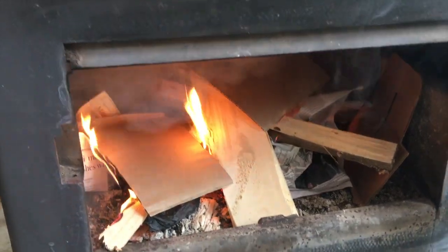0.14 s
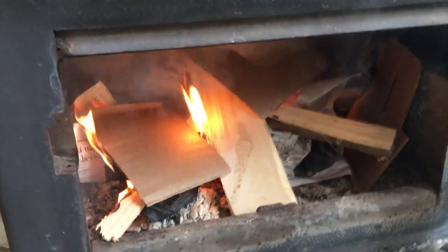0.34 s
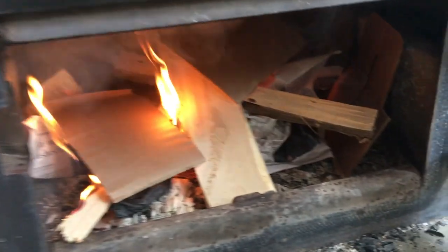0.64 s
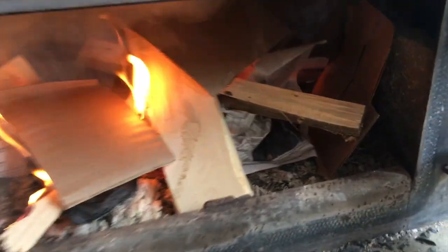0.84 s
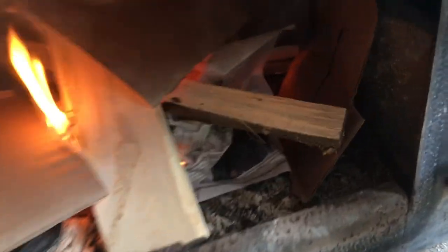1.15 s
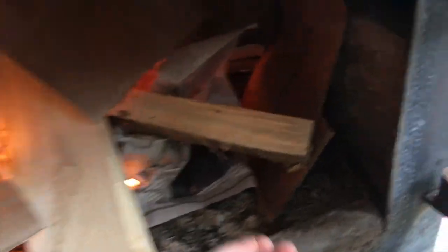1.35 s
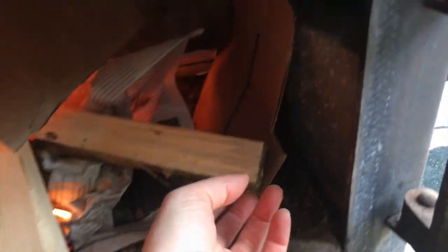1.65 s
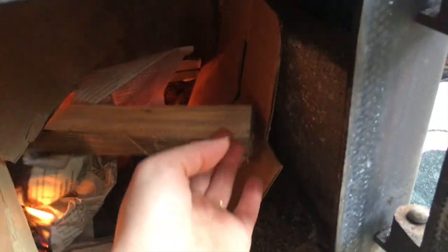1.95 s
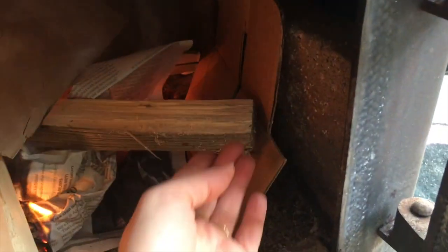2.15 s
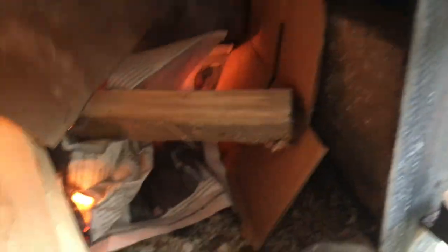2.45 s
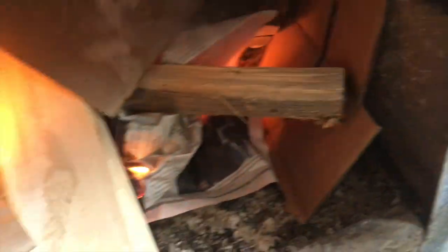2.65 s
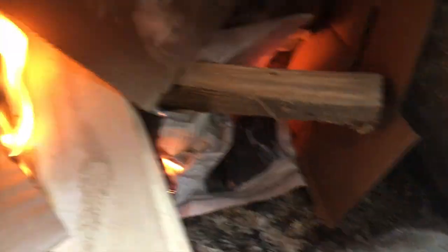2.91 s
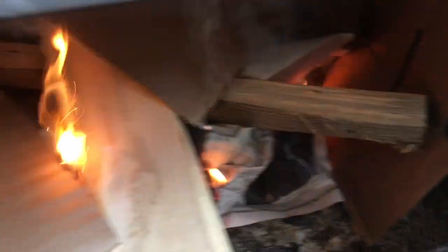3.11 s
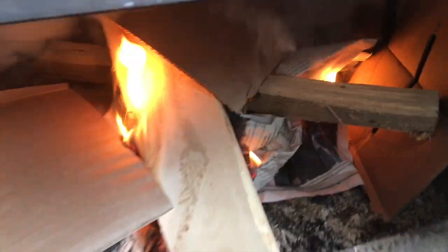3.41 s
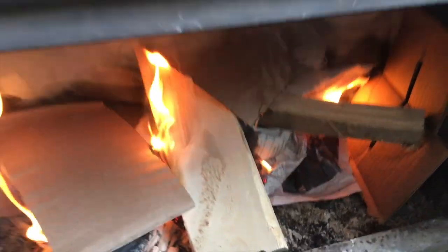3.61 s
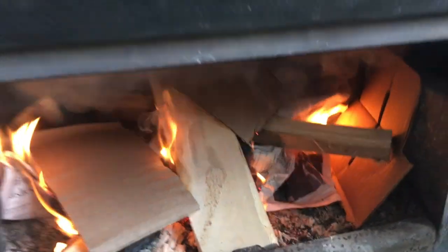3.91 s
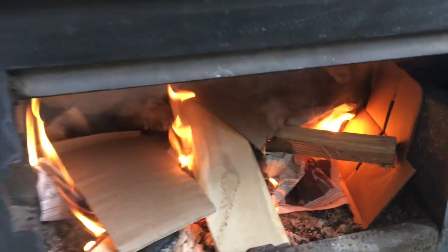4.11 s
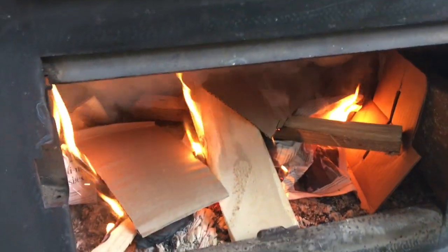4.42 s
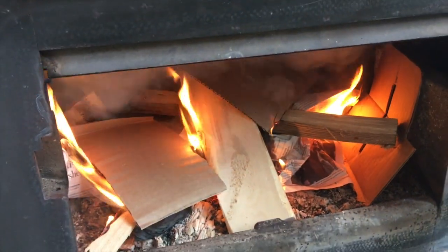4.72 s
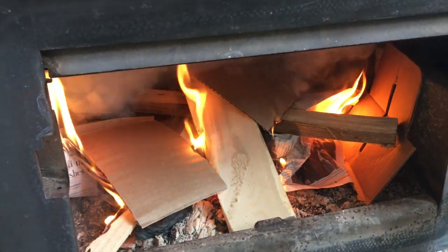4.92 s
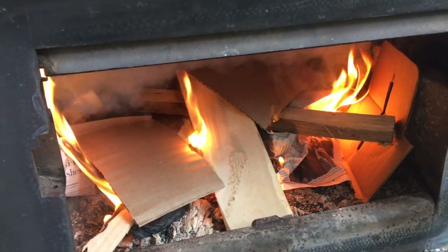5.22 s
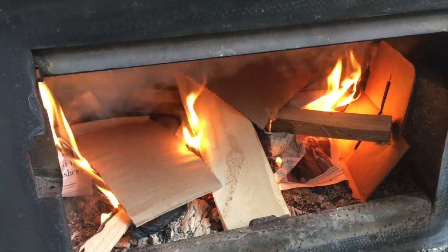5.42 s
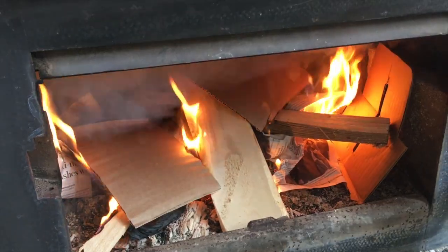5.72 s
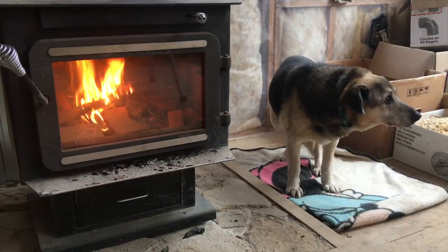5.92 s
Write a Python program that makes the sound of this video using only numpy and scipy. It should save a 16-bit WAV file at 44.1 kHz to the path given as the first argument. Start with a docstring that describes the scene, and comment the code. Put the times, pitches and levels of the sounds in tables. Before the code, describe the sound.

A handheld phone is close to an open steel wood stove in a small cabin. Quiet, low flame flutter swells and sinks over thin fizz, fine crackle and scattered small pops with tight metallic reflections. At 0.3 s a dull, reverberant clack comes from further off, with soft bumps. Cloth rustles from 0.5 s to about 1.9 s. Between 1.7 and 2.1 s rough wood scrapes over cardboard in two quick grainy shoves, with short woody knocks. More sleeve brushing and low bumps follow at 2.4 s. At 3.1 s a heavy thump, knock and hard bright snap coincide; a strong pop comes at 3.3 s. Light rubs and bumps fade towards 4.1 s. Sharp snaps at 4.3 and 4.45 s ring round the room, then loud pops at 5.5 and 5.6 s. Just before 6 s a low wavering hum with noise abruptly begins.

```python
"""Paper, cardboard and kindling catch fire in an open wood stove in a small cabin, heard from a phone at the door.
From the start filtered noise flutters as flames, over a faint fizz, random ticks and pops with steel reflections.
Soft bumps, rubs and a far clack join in; a sleeve rustles, then grainy friction pushes a stick over the cardboard.
Wood knocks ring in short modes, and three hard snaps from 3.1 s on ring round the room as decaying noise.
At the end a low drone, a wavering sine in a wash of noise, sets in."""
import sys
import numpy as np
from scipy import signal
from scipy.fft import rfft, irfft, next_fast_len
from scipy.io import wavfile
from scipy.ndimage import uniform_filter1d

SR = 44100
rng = np.random.default_rng(int(sys.argv[2]) if len(sys.argv) > 2 else 0)


def dump(signal):
    """Clip the signal to [-1, 1] and save it as 16-bit WAV at the path in sys.argv[1]."""
    limited = np.clip(np.atleast_2d(signal).T, -1, 1)
    pcm = np.round(limited * 32767).astype(np.int16)
    wavfile.write(sys.argv[1], SR, pcm)


N = 267113
T = np.arange(N) / SR

# spectrum of the pops and ticks of burning fibre: f/Hz, level/dB
POP_COLOUR = [(150, -3.5), (500, -18.5), (900, -17), (1600, -15.5), (2500, -9), (4500, -10), (7000, -7.5),
              (11000, -4), (15000, -3.5), (16500, -6.5)]
# spectrum of wood against cardboard: f/Hz, level/dB
SLIDE_COLOUR = [(200, 0), (380, 4), (600, -0.5), (800, -4.5), (1200, -0.5), (1900, -1), (2400, 2.5),
                (4300, -2), (6000, 5), (9000, 0.5), (14000, 4.5), (16000, -4.5)]


def amp(db):
    """Decibels to gain."""
    return 10 ** (np.asarray(db) / 20)


def unit(x):
    """Scale to rms 1."""
    return x / np.sqrt(np.mean(x ** 2))


def burst(x, db):
    """Scale a short sound so that its energy, packed into 3 ms, has this level."""
    return x * amp(db) * np.sqrt(.003 * SR / np.sum(x ** 2))


def fade(t, t60):
    """Exponential decay that falls 60 dB in t60 seconds."""
    return np.exp(-np.log(1000) * t / t60)


def follow(rows):
    """Gain along a (t/s, level/dB) curve, silent beyond it and smoothed over 400 samples."""
    s, db = np.transpose(rows)
    inside = (T >= s[0]) * (T <= s[-1])
    return uniform_filter1d(amp(np.interp(T, s, db)) * inside, size=400)


def colour(x, points, shelf_db=0, shelf_hz=3500):
    """Causal minimum-phase filter through (f/Hz, level/dB) points, with a shelf that lifts or cuts the lows."""
    n = next_fast_len(len(x) + 4096) * 2
    f = np.maximum(np.arange(n // 2 + 1) * SR / n, 1)
    hz, db = np.transpose(points)
    shelf = shelf_db / (1 + np.square(np.square(f / shelf_hz)))
    db = np.interp(np.log(f), np.log(hz), db) + shelf
    # folding the cepstrum forward in time makes the filter causal
    cepstrum = irfft(np.log(amp(db)))
    cepstrum[1:n // 2] *= 2
    cepstrum[n // 2 + 1:] = 0
    response = np.exp(rfft(cepstrum))
    return irfft(rfft(x, n) * response)[:len(x)]


def walk(rate):
    """Smooth, bounded random wander with an rms of 1, drawing `rate` new targets per second."""
    k = max(int(SR / rate), 1)
    steps = np.repeat(rng.uniform(-1, 1, N // k + 1), k)
    return unit(uniform_filter1d(steps, size=k)[:N])


def grains(rate, spread_db):
    """Random impulses, `rate` per second on average, mostly small and a few large."""
    hits = rng.random(N) < rate / SR
    signs = rng.choice([-1, 1], N)
    sizes = amp(spread_db * np.minimum(rng.exponential(size=N), 4))
    return hits * signs * sizes


def add(out, s, x):
    """Mix a short sound in at time s."""
    i = max(int(s * SR), 0)
    out[i:i + len(x)] += x[:N - i]


def click(points):
    """A single clean click with this spectrum."""
    return colour(signal.unit_impulse(SR // 25), points)


def ring(modes, detune):
    """A struck body's decaying modes (f/Hz, t60/s, level/dB), a little different at every blow."""
    t = T[:SR // 3]
    out = np.zeros(len(t))
    for hz, t60, db in modes:
        blow_hz = hz * (1 + detune * rng.standard_normal())
        out += amp(db) * np.sin(2 * np.pi * blow_hz * t) * fade(t, t60)
    return out


def firebox(ring_db, t60):
    """One click and its dense reflections between the steel plates."""
    t = T[:SR // 25]
    echoes = rng.standard_normal(len(t)) * fade(t, t60)
    echoes *= amp(ring_db) / np.linalg.norm(echoes)
    echoes[0] = 1
    return echoes


def cabin(x, t60_low, t60_high, echo_s, echo_db):
    """Diffuse room tail with separate low and high decays that swells again off the far wall."""
    t = T[:SR // 2]
    low, high = rng.standard_normal((2, len(t)))
    low = colour(low, [(300, -1.5), (2500, 2.5), (6000, 1.0), (14000, -7.5)]) * fade(t, t60_low)
    high = colour(high, [(3000, -20), (9000, -0.5), (14000, 0.5)]) * fade(t, t60_high)
    echo = 1 + amp(echo_db) * (t > echo_s) * fade(np.abs(t - echo_s), 0.053)
    build_up = np.clip(t / 0.016, 0, 1)
    tail = (low + high) * echo * build_up
    return signal.fftconvolve(x, tail / np.linalg.norm(tail))[:N]


def strokes(rows, power):
    """Each movement speeds up from rest and slows again; friction noise grows as a power of the speed."""
    gain = np.zeros(N)
    for start, fastest, end, db in rows:
        speed = np.sin(np.interp(T, [start, fastest, end], [0, np.pi / 2, 0]))
        gain += amp(db) * speed ** power
    return gain


def flames(gain_db, flutter_db):
    """Unsteady burning drives a low flutter in the firebox."""
    # flames, strongest while the phone is nearest: t/s, level before gain_db/dB
    flame_curve = [(0.0, -68.5), (0.25, -62.5), (0.59, -66), (0.88, -56), (1.3, -62), (1.53, -57.5),
                   (1.67, -56.5), (1.95, -54), (3.03, -60.5), (3.15, -62.5), (3.74, -60.5), (4.08, -55.5),
                   (4.55, -65), (5.11, -65.5), (6.05, -56.5)]
    # spectrum of the flutter: f/Hz, level/dB
    flame_colour = [(15, -47.5), (25, -13.5), (69, 1), (92, 2), (119, 0), (151, -10.5), (184, -15),
                    (301, -23), (472, -30.5), (565, -33), (900, -36), (1170, -57), (1980, -120)]
    roar = unit(colour(rng.standard_normal(N), flame_colour))
    return roar * follow(flame_curve) * amp(gain_db + flutter_db * walk(24))


def air(gain_db, waver_db):
    """A faint, slightly wavering fizz of noise under everything."""
    # steady fizz of the fire and the air of the cabin: f/Hz, level/dB
    air_colour = [(180, -22), (300, 2.5), (447, -5.5), (1030, -6.5), (1230, -10.5), (1930, -7.5),
                  (4910, -11), (7080, -3), (7690, -12), (14200, -3.5), (16000, -6.5)]
    fizz = unit(colour(rng.standard_normal(N), air_colour))
    return fizz * amp(-68 + gain_db + waver_db * walk(4.7))


def crackle(db):
    """Countless tiny ticks of burning paper between the pops, each a short spit of noise."""
    ticks = np.abs(grains(rate=110, spread_db=6.0))
    spits = signal.fftconvolve(ticks, fade(T[:SR // 25], 0.025))[:N]
    return amp(db) * unit(colour(spits * rng.standard_normal(N), POP_COLOUR))


def faint_pops(per_s, db, spread_db):
    """Small pops at random moments, as rows of t/s, level/dB and lift of the mids/dB."""
    rows = []
    for when, size, mids in rng.random((int(per_s * N / SR), 3)):
        rows.append((when * N / SR, db + spread_db * (2 * size - 1), 10 * (2 * mids - 1)))
    return rows


def pops(gain_db, body_db, room_db, ring_db, ring_t60):
    """Pockets of gas burst the fibres, each with its own firebox reflections; returns near sound and room feed."""
    # louder pops in the firebox: t/s, level before the layer gains/dB, lift of the mids before body_db/dB
    loud_pops = [(0.1668, -47, -6), (0.8296, -52, 9), (1.0087, -48, 4), (1.042, -48.5, -14),
                 (1.192, -50.5, 7), (1.3393, -50, -4), (1.443, -43.5, 8), (1.592, -42.5, -0.5),
                 (1.6488, -47, -4), (1.6775, -48.5, 17), (2.2254, -49, 3), (2.2377, -46.5, 0),
                 (2.5546, -49, 15), (2.6894, -51, 11), (2.7566, -46.5, 6), (2.9704, -42.5, 6),
                 (3.08, -47, -6), (3.2794, -47, -5), (3.3367, -27.5, -3.5), (3.647, -50.5, 4),
                 (3.887, -52, -12), (4.107, -42.5, 0), (4.1921, -47.5, 5), (4.2545, -42.5, 1),
                 (4.79, -50, 1.5), (4.9144, -48.5, 9.5), (4.984, -42, -6.5), (5.297, -47.5, -2.5),
                 (5.4732, -23, -3.5), (5.6314, -20, -4.5), (5.8263, -47.5, -17)]
    out, feed, clean = np.zeros(N), np.zeros(N), click(POP_COLOUR)
    for s, db, mids_db in loud_pops + faint_pops(per_s=8, db=-60, spread_db=1.5):
        pop = colour(firebox(ring_db=ring_db, t60=ring_t60), POP_COLOUR, shelf_db=mids_db + body_db)
        add(out, s, burst(pop, db + gain_db))
        add(feed, s, burst(clean, db + room_db))
    return out, feed


def rubs(gain_db, width):
    """Friction noise in a gliding resonance whose width is a share of its first pitch."""
    # brief rubs as things are handled: start/s, end/s, first f/Hz, last f/Hz, level before gain_db/dB
    rub_rows = [(0.102, 0.221, 176, 188, -58), (0.933, 1.095, 200.5, 226.4, -60.5),
                (1.101, 1.17, 585, 472, -65.5), (1.73, 1.789, 6470, 6200, -54),
                (1.791, 1.99, 359.6, 397, -57.5), (2.836, 3.004, 1355, 1310, -65),
                (3.249, 3.555, 1255, 1106, -63.5), (3.52, 3.611, 801, 560, -62.5),
                (3.84, 3.957, 167.6, 190, -58), (4.083, 4.142, 279, 180, -61)]
    out = np.zeros(N)
    for start, end, first_hz, last_hz, db in rub_rows:
        glide_hz = np.interp(T, [start, end], [first_hz, last_hz])
        phase = 2 * np.pi * np.cumsum(glide_hz) / SR
        band = walk(width * first_hz) * np.cos(phase) + walk(width * first_hz) * np.sin(phase)
        stroke = np.sqrt(np.maximum((T - start) * (end - T), 0)) * 2 / (end - start)
        out += band * stroke * amp(db + gain_db)
    return out


def bumps(cycles):
    """Each bump is a low swing that dies by 60 dB in a few cycles."""
    # soft bumps and puffs of air on the hand-held phone: t/s, level before a 5 dB lift/dB, f/Hz
    bump_rows = [(0.28, -47.5, 109), (0.688, -47.5, 90), (0.98, -42.5, 115), (1.52, -46, 84),
                 (1.597, -43, 100), (1.855, -39, 123), (2.117, -48, 380), (2.449, -38.5, 176),
                 (2.532, -33.5, 73), (2.535, -41, 230), (3.104, -25.5, 66.4), (3.105, -27, 159),
                 (3.434, -41, 86), (3.596, -43.5, 89), (3.875, -34.5, 55), (4.096, -38, 56),
                 (4.73, -42.5, 92)]
    out, t = np.zeros(N), T[:SR // 4]
    soft_onset = 1 - fade(t, 0.006)
    for s, db, hz in bump_rows:
        swing = np.sin(2 * np.pi * hz * t) * fade(t, cycles / hz)
        add(out, s, amp(db + 5.0) * swing * soft_onset)
    return out


def clack(s, db, direct_db, ring_db, room_db):
    """Something clacks further off in the cabin: a hard but dull onset, a faint ring and much reverberation."""
    # spectrum of the clack fed to the room: f/Hz, level/dB
    clack_colour = [(300, -2.5), (800, -30), (1000, 1), (1180, -14), (1400, -6), (2100, 0), (3100, -5.5),
                    (4200, -6.5), (4700, -15), (5400, -7), (6800, -17), (7600, -28), (16000, -31)]
    # ring of the clack: f/Hz, t60/s, level/dB
    clack_modes = [(996, 0.16, 4), (1346, 0.26, 0), (1730, .2, -7), (1960, 0.21, 2), (2190, 0.29, 5),
                   (2290, 0.23, -3), (2980, 0.18, 2), (4060, .2, -18), (5420, 0.54, -5.5)]
    direct, feed = np.zeros(N), np.zeros(N)
    onset_colour = [(300, -18), (800, -19), (1100, -1.0), (2000, 7), (3100, 1), (4000, -39), (16000, -45)]
    onset = colour(firebox(ring_db=12, t60=0.053), onset_colour)
    add(direct, s + .003, burst(onset, db + direct_db))
    add(direct, s + .003, burst(ring(clack_modes, detune=0.004), db + ring_db))
    add(feed, s, burst(click(clack_colour), db + room_db))
    return direct + cabin(feed, t60_low=0.41, t60_high=0.67, echo_s=0.026, echo_db=-8)


def knocks(gain_db, tick_db):
    """Kindling knocks: a bright contact tick and the short ring of the wood."""
    # the stick catches and wood shifts: t/s, level before the layer gains/dB, treble relative to that level/dB
    knock_rows = [(0.387, -49, -4), (1.741, -64.5, 21), (1.816, -55, 23), (1.848, -42.5, 8.5),
                  (1.878, -45, 4.5), (1.903, -48, 7), (2.045, -51.5, 20.5), (2.115, -38.5, -3),
                  (2.450, -48.5, -19), (3.106, -29.5, 4.5), (3.254, -40, -9), (3.338, -46, -14),
                  (3.520, -45.5, -26), (3.584, -48.5, -20), (4.109, -51.5, -14), (5.776, -58.5, 5.5)]
    # ring of the wood: f/Hz, t60/s, level/dB
    wood_modes = [(381, 0.069, -5), (496, 0.035, -3.5), (615, 0.05, -4), (1153, 0.026, 3.5),
                  (1434, 0.025, 1), (2090, 0.007, -4), (2604, 0.051, -4.5)]
    out = np.zeros(N)
    for s, db, treble_db in knock_rows:
        add(out, s, burst(ring(wood_modes, detune=0.077), db + gain_db))
        tick = colour(firebox(ring_db=11.5, t60=0.045), SLIDE_COLOUR)
        add(out, s, burst(tick, db + treble_db + tick_db))
    return out


def sleeve(gain_db, rough_db):
    """Cloth brushes on cloth while the arm moves."""
    # movements of the arm: start/s, fastest/s, end/s, level before gain_db/dB
    arm_moves = [(.5, 1.18, 1.93, -59.5), (2.17, 2.36, 2.67, -57.5), (2.76, 2.93, 3.22, -56),
                 (3.23, 3.29, 3.87, -56.5), (3.8, 3.88, 4.05, -66.5), (4.04, 4.11, 4.63, -69.5)]
    # spectrum of the cloth: f/Hz, level/dB
    sleeve_colour = [(200, 2), (500, -4), (800, -0.5), (1250, 2.5), (1700, -1), (2600, -0.5), (4500, -5),
                     (6000, -3.5), (9000, -5.5), (16000, -7)]
    brush = unit(colour(grains(rate=6000, spread_db=2), sleeve_colour))
    return brush * strokes(arm_moves, power=1.37) * amp(gain_db + rough_db * walk(35))


def slide(gain_db, jerk_db, splinter_db):
    """Rough wood drags over cardboard in dense fine grains; now and then a splinter catches."""
    # the hand shoves the stick twice: start/s, fastest/s, end/s, level before gain_db/dB
    shoves = [(1.73, 1.865, 1.956, -42.5), (1.87, 1.97, 2.137, -46)]
    fine = unit(grains(rate=4000, spread_db=3.5))
    splinters = amp(splinter_db) * unit(grains(rate=290, spread_db=2.5))
    rub = unit(colour(fine + splinters, SLIDE_COLOUR))
    return rub * strokes(shoves, power=1.57) * amp(gain_db + jerk_db * walk(90))


def snaps(gain_db, scatter_db, scatter_t60, body_db):
    """Hard cracks arrive straight, then off the stove, over a short hollow ring; returns near sound and room feed."""
    # hard snaps in front of the stove: t/s, level before the layer gains/dB, share sent round the room/dB
    snap_rows = [(3.1028, -19, -18), (4.2781, -16.5, -10.5), (4.4546, -18, -11)]
    # spectrum of a snap: f/Hz, level/dB
    snap_colour = [(100, -2), (350, -6.5), (520, -9), (680, -4.5), (860, -13.5), (1050, -7.5), (1600, -7.5),
                   (3000, 2.5), (4500, 0.5), (6500, 4), (9000, 6), (12000, 5), (15000, 2), (16500, -7)]
    # straight and off the stove front: delay/s, level/dB
    snap_paths = [(0, -1), (.0013, 1), (.0033, -5.5)]
    # hollow body of a snap: f/Hz, t60/s, level/dB
    snap_modes = [(372, 0.037, -8), (687, 0.032, -3.5), (1050, 0.015, 3), (2140, 0.021, -5)]
    out, feed = np.zeros(N), np.zeros(N)
    for s, db, room_db in snap_rows:
        crack = np.zeros(SR // 20)
        for delay, path_db in snap_paths:
            # weaker arrivals have met more surfaces and are more diffuse
            arrival = firebox(ring_db=scatter_db - 1.95 * path_db, t60=scatter_t60)
            add(crack, delay, amp(path_db) * arrival)
        add(out, s, burst(colour(crack, snap_colour), db + gain_db))
        add(out, s + 0.002065, burst(ring(snap_modes, detune=0.043), db + body_db))
        add(feed, s, burst(click(snap_colour), db + room_db))
    return out, feed


def drone(start_s, gain_db, hum_hz, hum_db, hiss_db):
    """A wavering low hum in a wash of noise sets in abruptly."""
    # spectrum of the wash of noise: f/Hz, level/dB
    drone_colour = [(71, -43), (120, -5), (261, -6), (483, -29), (805, -27), (968, -26), (1460, -27.5),
                    (1750, -29), (3520, -32), (4320, -36.5), (5750, -33.5), (12000, -32), (16000, -31)]
    wander_hz = hum_hz * (1 + 0.02 * walk(40))
    hum = np.sin(2 * np.pi * np.cumsum(wander_hz) / SR) * amp(hum_db + 1.2 * walk(29.8))
    wash = amp(hiss_db) * unit(colour(rng.standard_normal(N), drone_colour))
    onset = np.clip((T - start_s) / 0.0069, 0, 1)
    return (hum + wash) * amp(gain_db) * onset


def scene():
    """Fire, handling and background sound direct; pops, snaps and some of the wood also excite the cabin."""
    popping, pop_feed = pops(gain_db=1.0, body_db=-3.5, room_db=-22.5, ring_db=0.5, ring_t60=0.02)
    fire = flames(gain_db=3, flutter_db=1.5) + crackle(db=-67.5) + popping
    handling = rubs(gain_db=-2.0, width=.4) + bumps(cycles=4.7) + sleeve(gain_db=-.5, rough_db=1)
    background = air(gain_db=-1.5, waver_db=-0.9)
    background += clack(s=.280, db=-41.5, direct_db=3, ring_db=-0.5, room_db=7.0)
    background += drone(start_s=5.96, gain_db=-50, hum_hz=247, hum_db=0.5, hiss_db=-1.0)
    wood = knocks(gain_db=-4.5, tick_db=-3) + slide(gain_db=-1, jerk_db=2.6, splinter_db=-3.5)
    snapping, snap_feed = snaps(gain_db=-0.5, scatter_db=-3.5, scatter_t60=0.017, body_db=-18.5)
    room_feed = pop_feed + snap_feed + amp(-17.5) * wood
    room = cabin(room_feed, t60_low=0.36, t60_high=0.28, echo_s=.032, echo_db=-2.5)
    return (fire + snapping + wood + room + handling + background)[None]


def record(dry):
    """The phone drops the deepest bass below 36 Hz and cuts the top above 15.9 kHz."""
    bass_cut = signal.butter(4, 36, "high", fs=SR, output="sos")
    top_cut = signal.ellip(8, .2, 70, 15900, fs=SR, output="sos")
    return signal.sosfilt(top_cut, signal.sosfilt(bass_cut, dry))


dry = scene()
out = record(dry)
dump(out)
```